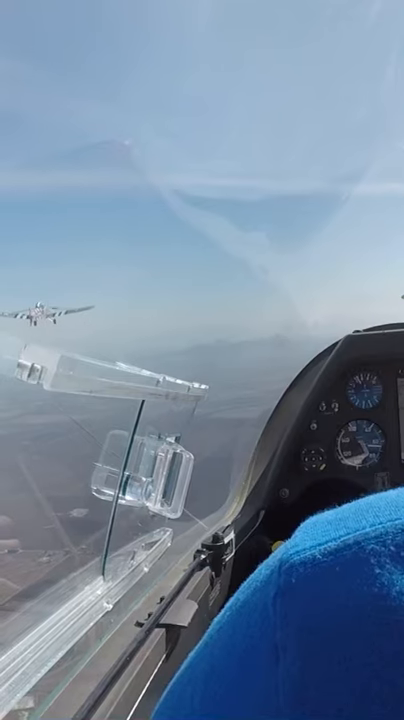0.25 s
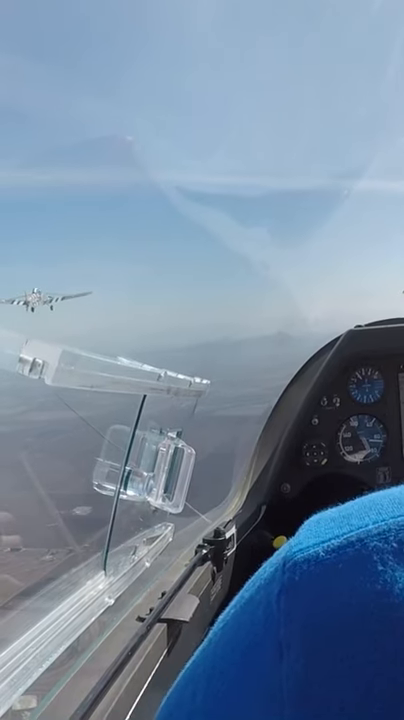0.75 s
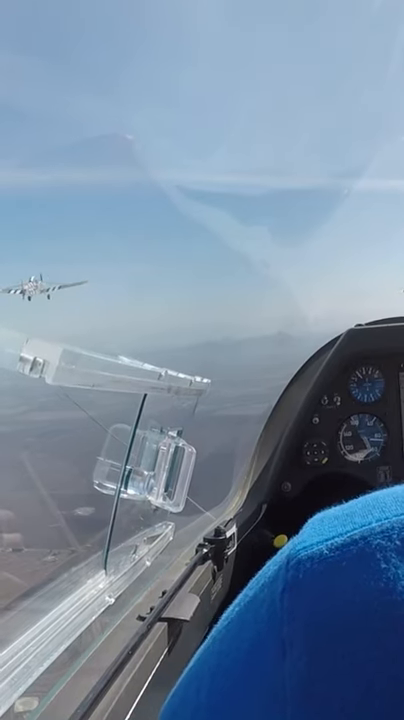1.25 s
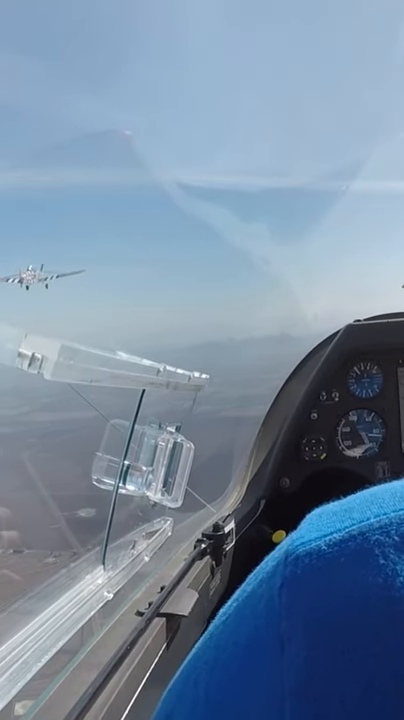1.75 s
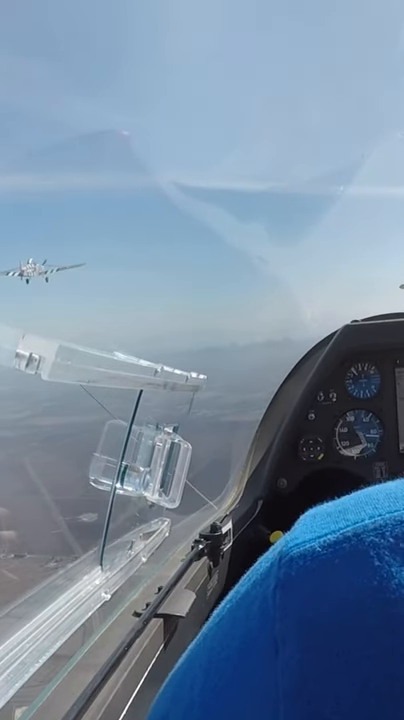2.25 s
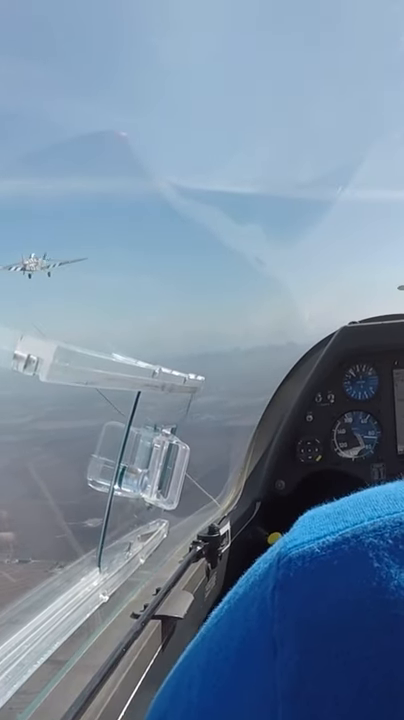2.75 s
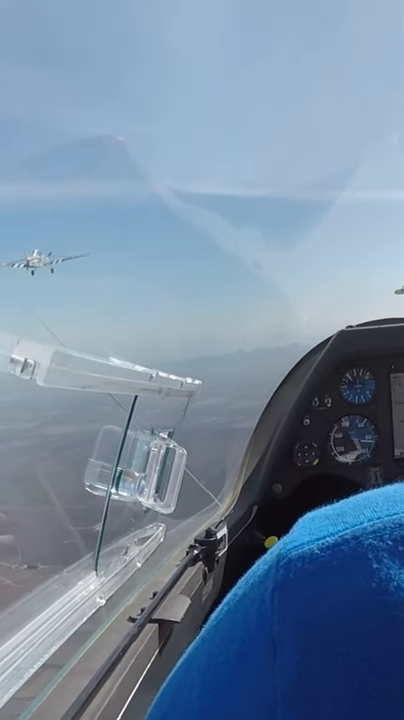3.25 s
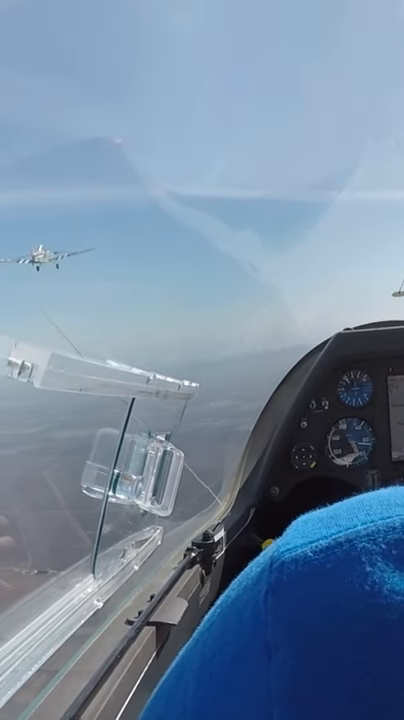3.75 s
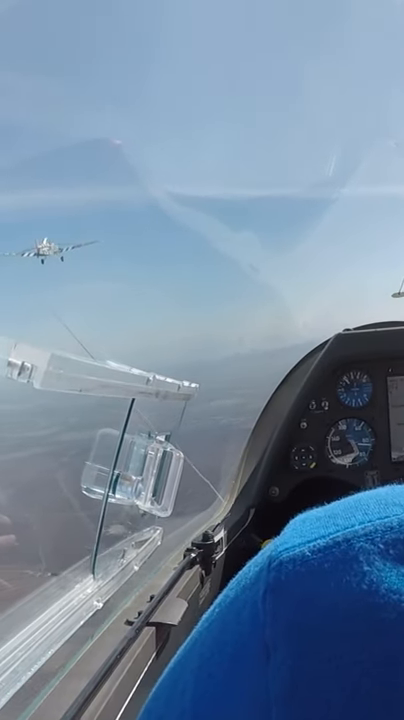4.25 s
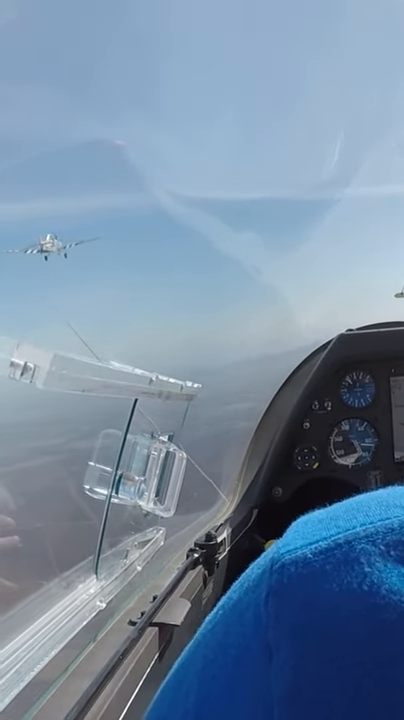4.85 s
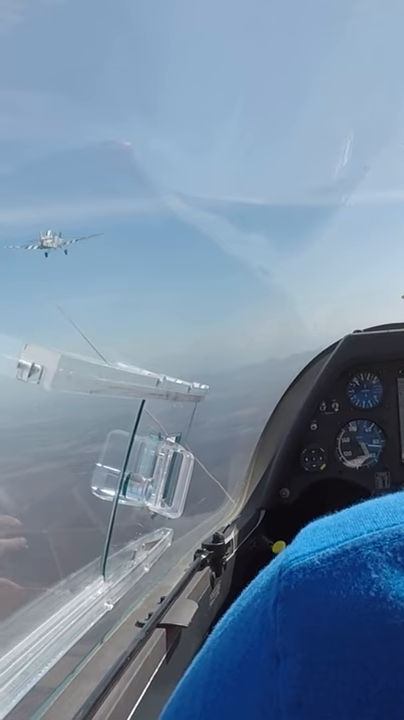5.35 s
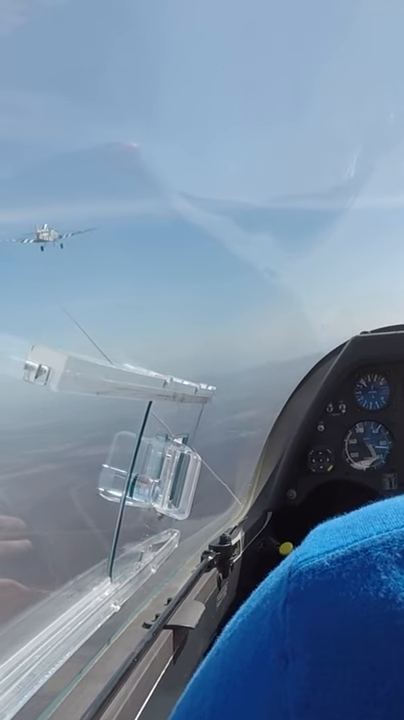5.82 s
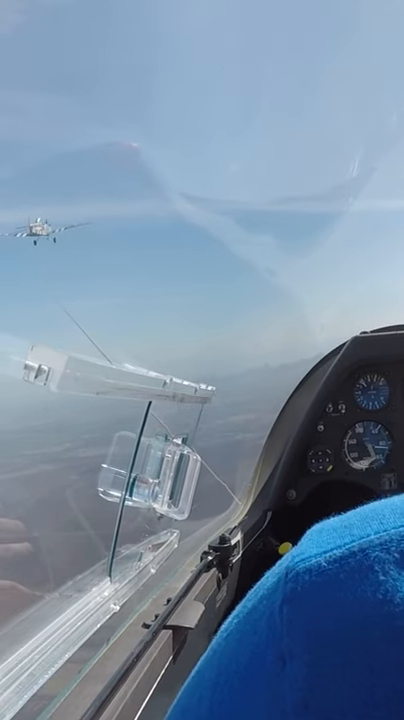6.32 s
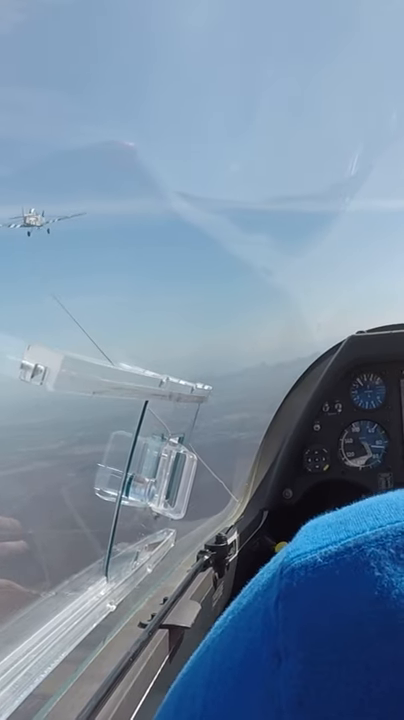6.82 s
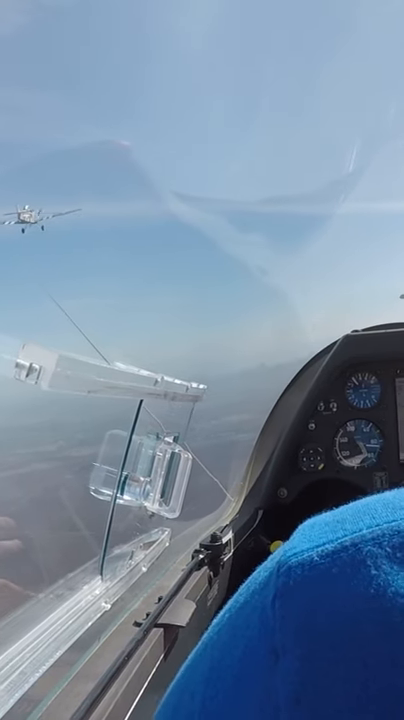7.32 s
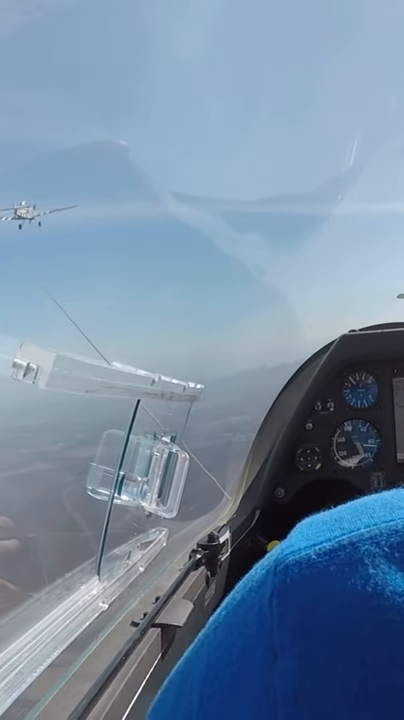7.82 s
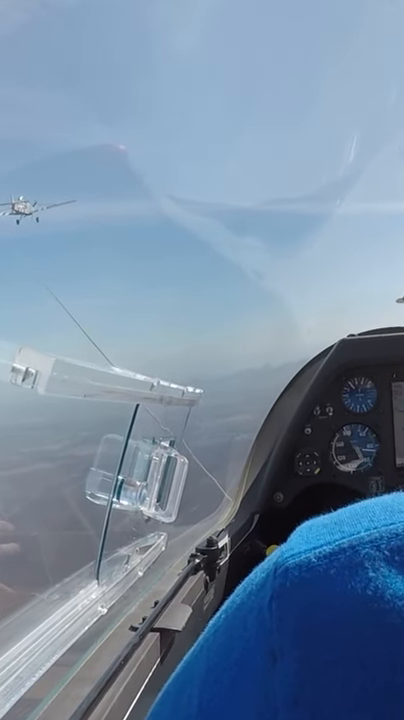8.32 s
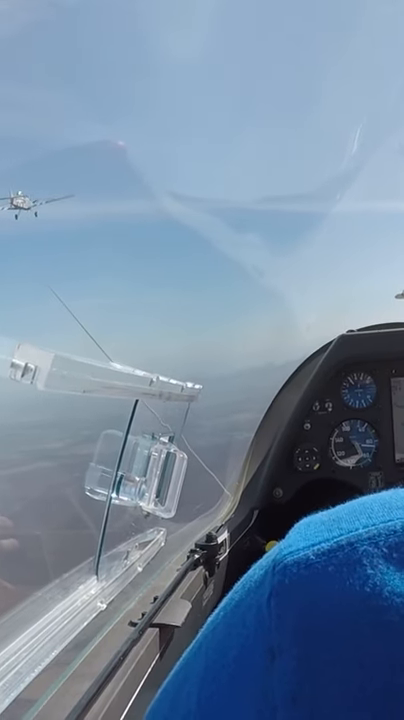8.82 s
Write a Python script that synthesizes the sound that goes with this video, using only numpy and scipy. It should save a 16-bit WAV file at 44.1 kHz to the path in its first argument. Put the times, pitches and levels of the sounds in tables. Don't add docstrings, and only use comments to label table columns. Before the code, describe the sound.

A continuous nine-second stretch inside a glider cockpit under tow, heard by a small housed microphone close by, dry and slightly limited. From the start, heavy low rumble dominates: turbulent air drums the fuselage shell in irregular soft buffets, several a second, with stronger swells near 2.8, 4.9, 5.7, 6.8 and 8.4. Over it air rushes steadily across the canopy, roaring a little more at about 3.9 and 6.3, with a hollow cabin hum. A smooth, quieter vent hiss and thin seal leak stay nearly constant, easing slightly around 5 seconds; the leak dips briefly near 8.1. The tug's propeller is a faint, wavering low drone. A loose fitting gives a short, dull panel knock at 1.6, a softer double tap around 6.4 to 6.5, then the sharpest knock at 7.7 and lighter rattling taps at 7.9. The wind continues unchanged to the end.

```python
import sys
import numpy as np
from scipy import signal
from scipy.fft import rfft, irfft, next_fast_len
from scipy.io import wavfile
from scipy.ndimage import uniform_filter1d, minimum_filter1d

SR = 44100
rng = np.random.default_rng(int(sys.argv[2]) if len(sys.argv) > 2 else 0)


def to_wav(sig):
    pcm = np.clip(np.atleast_2d(sig), -1, 1) * 32767
    pcm = np.round(pcm).astype(np.int16)
    wavfile.write(sys.argv[1], SR, pcm.T)


def field_ratio(decibels):
    return 10 ** (np.asarray(decibels, dtype=float) / 20)


N = 400428

# time in seconds, level in dB.
AIRFLOW = [(0.03, -33.5), (0.08, -33), (4.39, -33), (4.8, -34), (5.1, -36), (5.55, -33), (6.25, -34.5),
           (6.28, -33.5), (8.24, -33), (8.54, -34), (8.94, -32.5), (9.04, -33)]

# frequency in Hz, width in Hz, level in dB.
SHELL_MODES = [
    [(61.5, 5, -4), (66.5, 4, 0), (77.5, 6, -7)],
    [(96.5, 2.4, 0), (92, 5, -12), (100, 4, -11)],
    [(114, 8, -1), (122, 6, -1.5), (135, 5, 0)],
]
# frequency in Hz, density in dB per Hz.
RUMBLE_SPECTRUM = [(15, -14), (25, -6), (35, -2.5), (48, -5), (80, -9), (140, -7), (170, -22)]
# time in seconds, level in dB.
LOWER_BUFFETS = [(0.51, -24), (1.26, -20), (2.06, -19.4), (2.33, -18), (2.93, -26), (3.52, -17),
                 (3.67, -21), (3.95, -22.5), (4.32, -25), (5.61, -28), (5.9, -24), (6.08, -15), (7.04, -19),
                 (7.63, -17), (8.03, -19), (8.49, -20)]
# time in seconds, length in seconds, level in dB.
MAIN_BUFFETS = [(0.14, 0.081, -20), (0.33, 0.089, -15.5), (0.638, 0.083, -18), (1.117, 0.11, -16),
                (1.74, 0.25, -15.5), (1.9, 0.12, -25), (2.06, 0.14, -23), (2.835, 0.16, -13.5),
                (3.067, 0.09, -16.1), (3.46, 0.08, -20), (4.243, 0.075, -18.1), (4.5, 0.14, -19.8),
                (4.852, 0.24, -11.5), (5.44, 0.09, -22), (5.706, 0.12, -12), (5.778, 0.06, -11.5),
                (5.937, 0.1, -17), (6.42, 0.1, -17), (6.56, 0.1, -19), (6.786, 0.15, -12),
                (7.697, 0.084, -19), (8.15, 0.12, -14), (8.397, 0.1, -9.5), (8.894, 0.17, -16.5)]
# time in seconds, level in dB.
UPPER_BUFFETS = [(0.06, -13.5), (0.71, -22), (1.46, -25), (1.84, -24), (2.14, -24), (2.85, -23),
                 (3.19, -21), (3.74, -18.1), (4.43, -13.8), (4.74, -17), (5.05, -15), (6.04, -15),
                 (6.63, -22), (7.82, -16.5), (8.29, -15), (8.78, -20)]
# rest level in dB, dB per dB of airflow, flutter in dB,
# evening time in seconds.
SHELL_MOTION = [
    (-21, 0.5, 1.8, .05),
    (-24, .8, 1.0, .04),
    (-21, 0.6, 1.7, .05),
]

# frequency in Hz, density in dB per Hz.
RUSH_SPECTRUM = [(82, -36), (140, -3), (161, -0.5), (314, -17), (377, -16), (414, -18.5), (509, -20),
                 (656, -22), (711, -17), (780, -21.5), (885, -17), (1540, -23.5), (2080, -32.5),
                 (2200, -33.5), (2860, -72), (4840, -120)]
# frequency in Hz, width in Hz, rise in dB.
CABIN_RESONANCES = [(148.3, 32, 6), (179, 34, 3.5), (225.2, 50, 8.5), (278.7, 31, 5), (374, 14, 2),
                    (393, 7.1, 3.5), (514.5, 23, 5), (718, 23, 1), (721, 15, 4), (892, 14, -1.5),
                    (880, 13, 6.5), (957, 11, -3.5), (596, 30, 1), (678, 64, -2.5)]
# frequency in Hz, width in Hz, rise in dB.
HOUSING_RESONANCES = [(2114, 296, -6), (2300, 63, 5), (2530, 160, 3.5), (3860, 150, 0.5), (4900, 99, 2)]
# time in seconds, level in dB.
ROAR_GUSTS = [(0.38, -26), (0.91, -25), (1.55, -26), (2.47, -26), (3.11, -29), (3.3, -29), (3.9, -19.8),
              (5.39, -30), (5.98, -31), (6.28, -20.5), (6.72, -28), (7.55, -26)]
# time in seconds, level in dB.
HUM_GUSTS = [(.61, -28.5), (2.4, -30), (2.83, -32), (3.45, -28.5), (4.05, -30), (5.5, -32), (6.6, -33),
             (7.08, -33), (8.44, -29), (8.83, -28)]
# rest level in dB, dB per dB of airflow, flutter in dB,
# evening time in seconds.
CANOPY_MOTION = [
    (-24, 1.3, 0.93, 0.085),
    (-33, 0.8, 1.0, .09),
    (-27, 1, .5, 0.27),
]

# frequency in Hz, density in dB per Hz.
VENT_SPECTRUM = [(1210, -31), (2050, -26), (2170, -7), (2570, -1), (3100, -3), (3860, -2), (6220, -4),
                 (6680, -7), (7210, -16), (8850, -19), (11000, -34), (14300, -61), (22000, -120)]
# frequency in Hz, density in dB per Hz.
SEAL_SPECTRUM = [(8000, -25), (10500, -8.5), (11300, -10.5), (12000, -3.5), (12700, -0.5), (14400, -7),
                 (15100, -7), (15500, -18), (17000, -30)]
# time in seconds, length in seconds, level change in dB.
SEAL_SHUT = [
    (4.78, .5, 0),
    (6.5, .6, 0),
    (8.1, .3, -4.5),
]

# multiple of the blade rate, level in dB rms.
BLADE_TONES = [(1, -28), (2, -46), (3, -44), (4, -52), (7, -50), (9, -50), (10, -52)]

# time in seconds, peak in dB, hardness from 0 to 1.
KNOCKS = [(1.588, -19, .8), (1.5955, -8, .45), (6.420, -21, .2), (6.503, -12, .5), (6.513, -16, .6),
          (7.721, -16, .9), (7.7243, -6, .7), (7.735, -10, .35), (7.881, -15, .2), (7.900, -12, .5),
          (7.929, -11, .5)]
# frequency in Hz, level in dB, 60 dB decay in seconds.
PANEL_MODES = [(265, -10, .05), (345, -9, .07), (410, -10, .07), (490, -9, .07), (590, -11, .04),
               (720, -7, .045), (860, -11, .04), (1110, -14, .05), (1400, -17, .03), (2520, -24, .02),
               (3660, -23, .015)]


def rms_one(x):
    return x / np.sqrt(np.mean(x ** 2) + 1e-20)


def coloured(gain_at):
    size = next_fast_len(N)
    hz = np.maximum(np.arange(size // 2 + 1) * SR / size, 1)
    spectrum = rfft(rng.standard_normal(size)) * gain_at(hz)
    return rms_one(irfft(spectrum, size)[:N])


def resonant_noise(spectrum, resonances=()):
    at, level = np.transpose(spectrum)

    def gain_at(hz):
        db = np.interp(np.log(hz), np.log(at), level, left=-120, right=-120)
        for mid, width, rise in resonances:
            db = db + rise / (1 + (2 * (hz - mid) / width) ** 2)
        return field_ratio(db)
    return coloured(gain_at)


def drift(rate_hz):
    return coloured(lambda hz: 1 / (1 + (hz / rate_hz) ** 2))


def airflow_db():
    s, db = np.transpose(AIRFLOW)
    return np.interp(np.arange(N) / SR, s, db)


def bumps(rows):
    t = np.arange(0, N, 64) / SR
    s, length, height = np.transpose(rows)[:, :, None]
    bells = height * np.exp(-4 * np.log(2) * ((t - s) / length) ** 2)
    return np.interp(np.arange(N) / SR, t, np.sum(bells, axis=0))


def lasting(rows, length):
    return [(s, length, db) for s, db in rows]


def levelled(x, even_s):
    span = int(even_s * SR)
    power = uniform_filter1d(uniform_filter1d(rms_one(x) ** 2, span), span)
    return rms_one(x / np.sqrt(power + 0.038))


def buffeted(x, swells, rest_db, follows, flutter_db, even_s):
    power = field_ratio(2 * rest_db)
    if swells:
        power = power + bumps([(s, length, field_ratio(2 * db)) for s, length, db in swells])
    flow_db = airflow_db()
    motion_db = follows * (flow_db - flow_db.mean()) + flutter_db * drift(6.0)
    return np.sqrt(power) * field_ratio(motion_db) * levelled(x, even_s)


def mode_group(modes):
    def gain_at(hz):
        power = sum(field_ratio(2 * db) / (1 + (2 * (hz - mid) / width) ** 2) ** 1.54 for mid, width, db in modes)
        return np.sqrt(power)
    return coloured(gain_at)


def shell():
    buffet_s, rumble_db = 0.15, -26
    buffets = lasting(LOWER_BUFFETS, buffet_s), MAIN_BUFFETS, lasting(UPPER_BUFFETS, buffet_s)
    drumming = 0
    for modes, rows, motion in zip(SHELL_MODES, buffets, SHELL_MOTION):
        drumming = drumming + buffeted(mode_group(modes), rows, *motion)
    return drumming + field_ratio(rumble_db) * resonant_noise(RUMBLE_SPECTRUM)


def lowpassed(x, top_hz):
    return signal.sosfiltfilt(signal.butter(4, top_hz, fs=SR, output="sos"), x)


def canopy():
    roar_top_hz, hum_top_hz, gust_s = 330, 430, 0.085
    air = resonant_noise(RUSH_SPECTRUM, CABIN_RESONANCES + HOUSING_RESONANCES[:1])
    roar = lowpassed(air, roar_top_hz)
    low = lowpassed(air, hum_top_hz)
    layers = roar, low - roar, air - low
    gusts = lasting(ROAR_GUSTS, gust_s), lasting(HUM_GUSTS, gust_s), []
    return sum(buffeted(layer, rows, *motion) for layer, rows, motion in zip(layers, gusts, CANOPY_MOTION))


def vent():
    seal_db = -25
    hiss = field_ratio(-0.04 + 0.22 * drift(12)) * resonant_noise(VENT_SPECTRUM, HOUSING_RESONANCES)
    seal = field_ratio(seal_db + bumps(SEAL_SHUT) + 0.2 * drift(8)) * resonant_noise(SEAL_SPECTRUM)
    return field_ratio(airflow_db()) * (hiss + seal)


def tug():
    blade_hz = 124.55
    turns = np.cumsum(blade_hz * (1 + 0.0015 * drift(1.9))) / SR
    drone = np.zeros(N)
    for multiple, db in BLADE_TONES:
        level = np.sqrt(2) * field_ratio(db + 3.0 * drift(1.5))
        drone += level * np.sin(2 * np.pi * multiple * turns)
    return drone


def fitting():
    contact_s = 0.0028
    out, t = np.zeros(N), np.arange(SR // 8) / SR
    hz, mode_db, t60 = np.transpose(PANEL_MODES)[:, :, None]
    swing_s = contact_s * (0.62 + 260 / hz)
    rings = np.cos(2 * np.pi * hz * (t - swing_s)) * field_ratio(-60 * t / (1.05 * t60))
    rise = np.minimum(t / contact_s * 1.5, 1)
    band = signal.butter(3, [380, 1100], "band", fs=SR, output="sos")
    rattles = rms_one(signal.sosfilt(band, rng.standard_normal((len(KNOCKS), len(t)))))
    for (s, db, hard), rattle in zip(KNOCKS, rattles):
        tilt_db = 14 * (hard - 0.5) * np.log2(hz / 600)
        ringing = np.sum(field_ratio(mode_db + tilt_db) * rings, axis=0)
        knock = 0.7 * ringing + 0.14 * rattle * field_ratio(-60 * t / 0.16)
        at = round(s * SR)
        out[at:at + len(t)] -= field_ratio(db) * rise * knock
    return out


def scene():
    return (shell() + canopy() + vent() + tug() + fitting())[None]


def band_limit(x):
    return signal.sosfilt(signal.butter(12, 15180, fs=SR, output="sos"), x)


def record(dry):
    ceiling, look_s = 0.72, 0.005
    span = int(look_s * SR)
    room_left = np.minimum(1, ceiling / (np.abs(dry) + 1e-9))
    gain = uniform_filter1d(minimum_filter1d(room_left, span), span)
    return band_limit(gain * dry)


dry = scene()
out = record(dry)
to_wav(out)
```